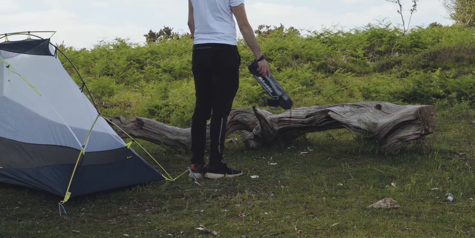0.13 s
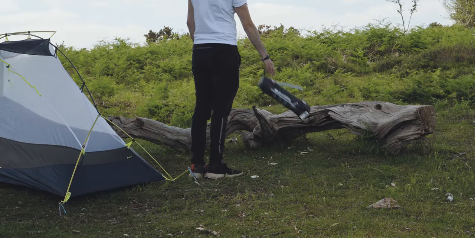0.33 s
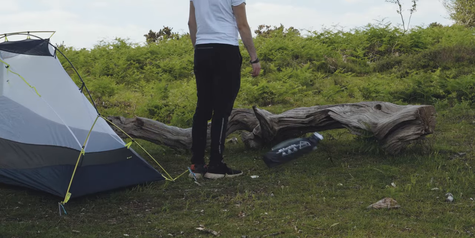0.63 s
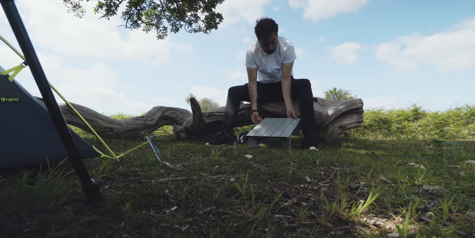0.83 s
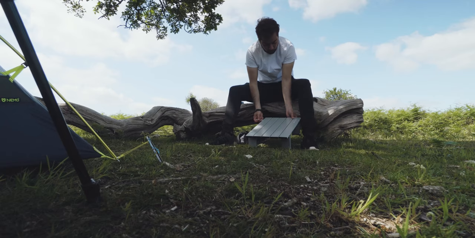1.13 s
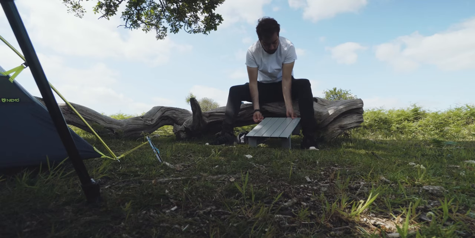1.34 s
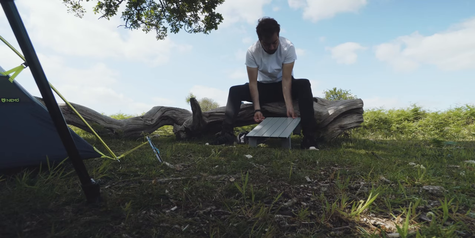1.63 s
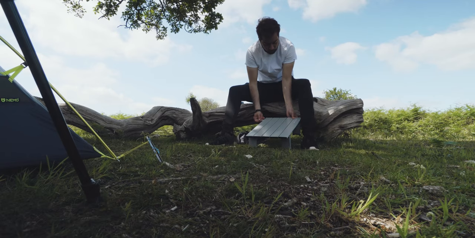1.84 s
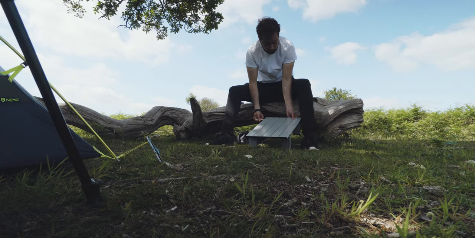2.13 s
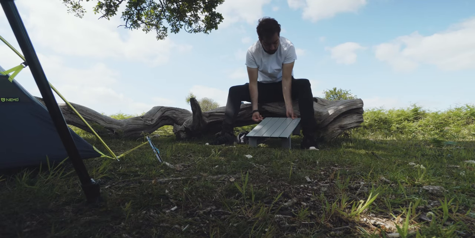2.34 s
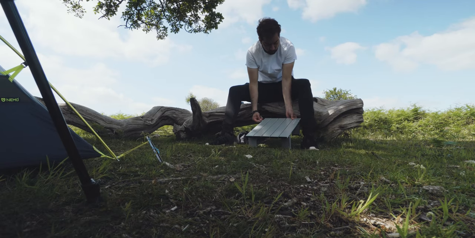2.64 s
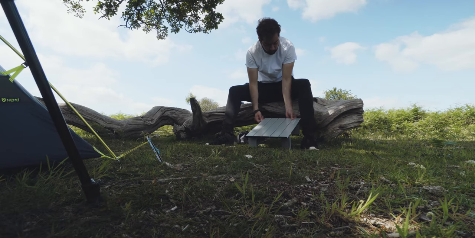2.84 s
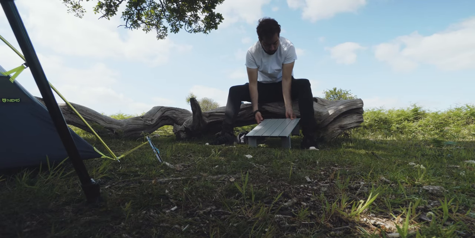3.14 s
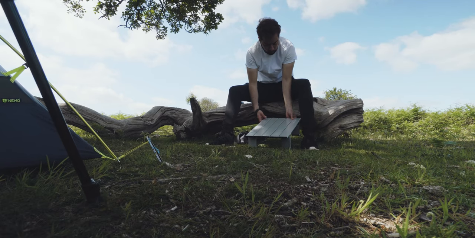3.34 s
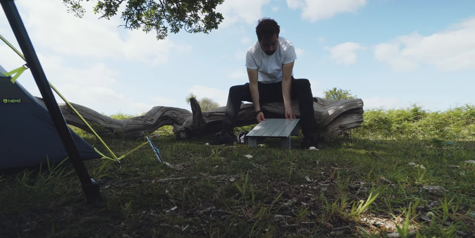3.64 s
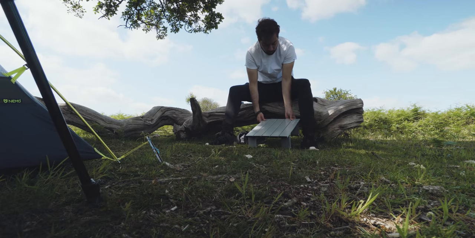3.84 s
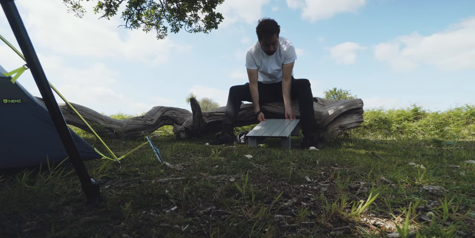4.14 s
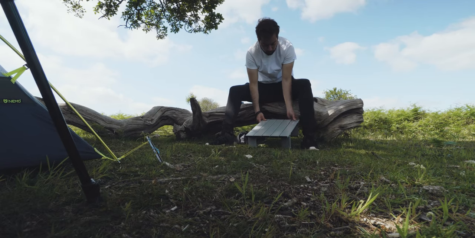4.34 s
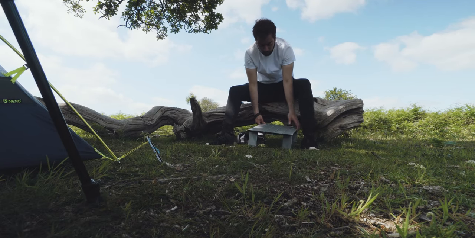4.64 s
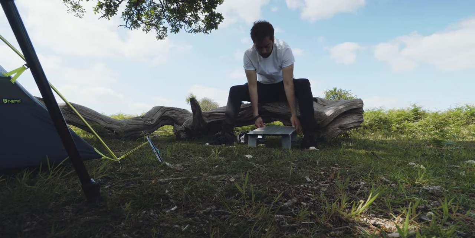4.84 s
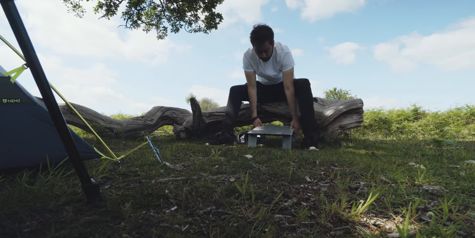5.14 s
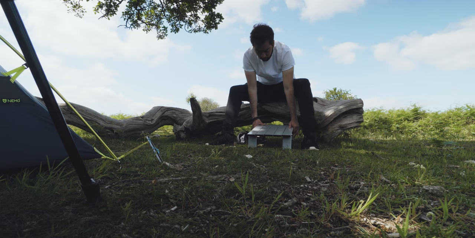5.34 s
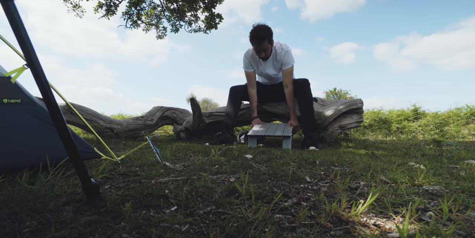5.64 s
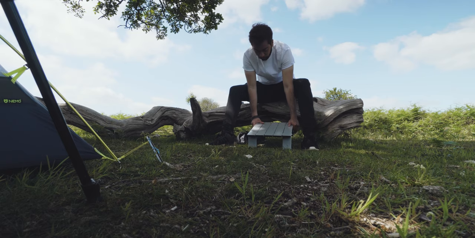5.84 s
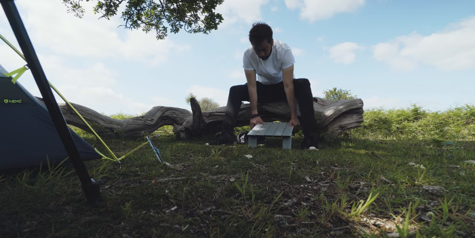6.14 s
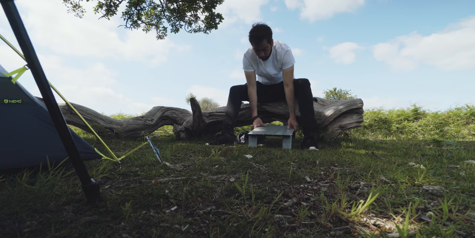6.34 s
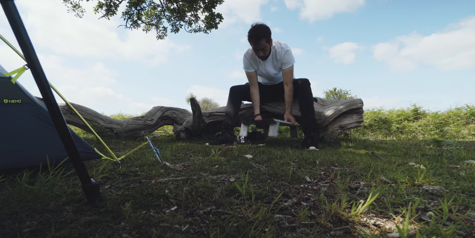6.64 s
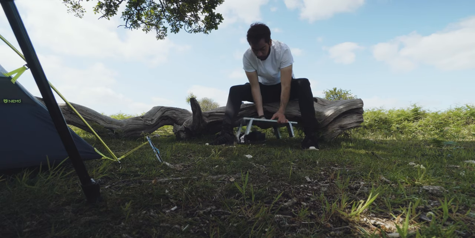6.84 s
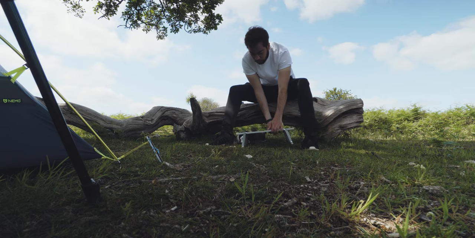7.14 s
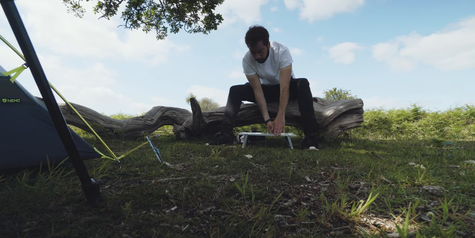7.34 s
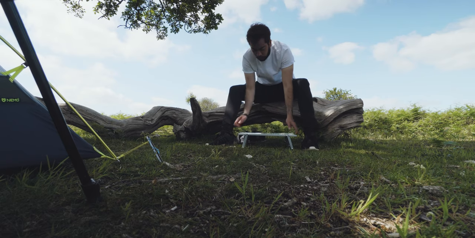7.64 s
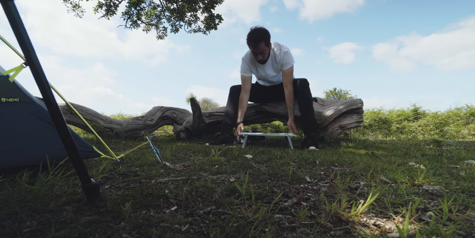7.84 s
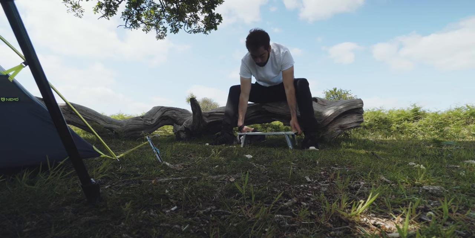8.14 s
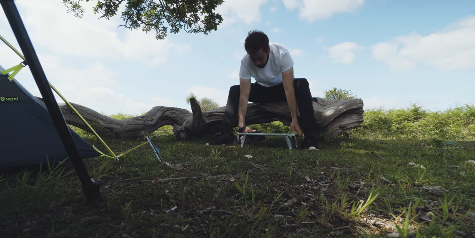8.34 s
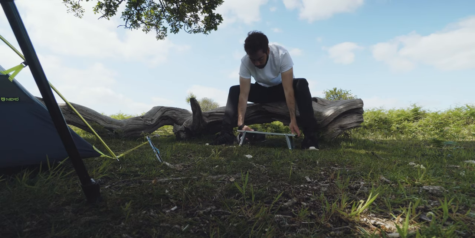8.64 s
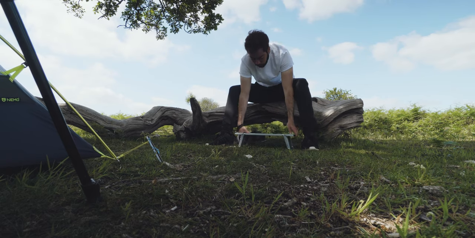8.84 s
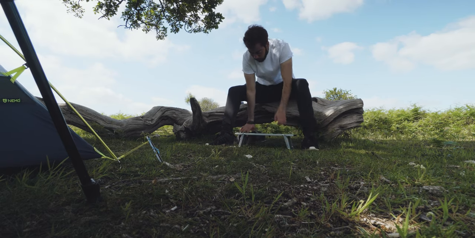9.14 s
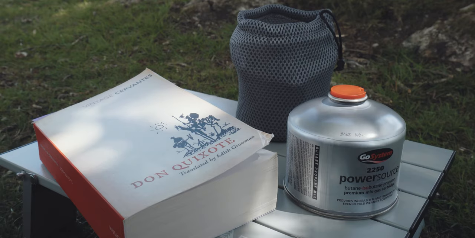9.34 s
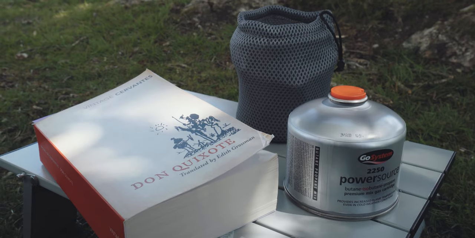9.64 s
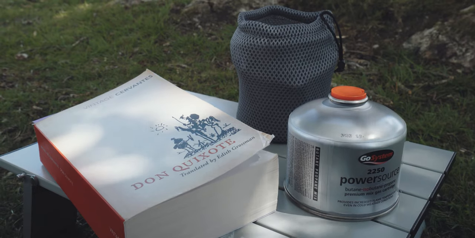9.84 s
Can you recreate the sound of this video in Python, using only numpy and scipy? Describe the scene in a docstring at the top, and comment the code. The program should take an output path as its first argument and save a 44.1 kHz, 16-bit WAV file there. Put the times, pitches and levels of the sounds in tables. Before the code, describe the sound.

A lightweight metal camp table is assembled on grass. A tight burst of dry clacks comes early, more snaps follow after pauses, the sharpest near four seconds. Then come quiet knocks, jiggling slats, thin scraping legs and small latch clicks, ending in brushing cloth and stirred leaves. The microphone stands a few metres off in nearly echo-free open air, with rumbling wind, distant roar and a weak engine drone.

```python
"""Slats of a light aluminium camp table clack, slide and snap together outdoors, a few metres away.
Its legs scrape and latch, small knocks set it down, and cloth and grass rustle over wind, roar and engine drone.
Noise bursts, random contacts and dying sines make the metal; filtered contacts make slides, scrapes and cloth.
The air is drifting shaped noise with crackling leaves, and the engine is a wavering tone with its octave."""
import sys
import numpy as np
from scipy import signal
from scipy.io import wavfile
from scipy.ndimage import uniform_filter1d

SR = 44100
rng = np.random.default_rng(int(sys.argv[2]) if len(sys.argv) > 2 else 0)


def to_wav(s):
    """Save 16-bit WAV."""
    ch = np.atleast_2d(s).T  # columns
    pcm = np.round(np.clip(ch, -1, 1) * 32767)  # PCM
    wavfile.write(sys.argv[1], SR, pcm.astype(np.int16))


N = 440559
TIME = np.arange(N) / SR

# Modes of the table top: [f/Hz, relative level/dB, t60/s when ringing freely]
TOP_MODES = [(454.3, 2.5, 0.11), (626, -34, 0.054), (978, 3, 0.11), (1002, -5.5, 0.23), (1192, -9, .5),
             (1280, 0, .12), (1357, -13, .5), (1422, -3, .11), (1700, -13, 0.13), (1838, -0.5, 0.17),
             (1930, -5.5, 0.12), (1990, 5, 0.09), (2148, -23, 0.2), (2240, -13, 0.083), (2540, -19, 0.37),
             (2730, -15, 0.29), (2774, -23, 0.12), (3380, -10.5, 0.12), (3576, -22, 0.12),
             (4050, -10, 0.12), (4386, -7.5, 0.15), (6100, -11, 0.11)]
# Crowd of short-lived slat resonances, as a spectrum: [f/Hz, relative level/dB]
SLAT_SPECTRUM = [(60, -18.5), (170, -9.5), (270, -14.5), (360, -4.5), (600, -6), (800, -4.5), (1400, 0.5),
                 (1900, -8), (2500, -12.5), (3300, -8), (4500, -13), (6000, -15), (10000, -21.5),
                 (16000, -30)]
# Modes of a leg: [f/Hz, relative level/dB, t60/s]
LEG_MODES = [(1850, 6, 0.055), (2010, 10, 0.056), (2945, -1.5, .05), (3530, -11, 0.043), (3990, 2, 0.03),
             (4500, -10, .04), (5030, 1.5, 0.059), (6100, -4, 0.045), (6570, 0, 0.026), (6740, -6, .03),
             (7300, -9, .03), (8500, -1, .03), (9100, -7, .02), (10000, -2, 0.025), (12300, -12, 0.0098)]
# Spectrum of rustling leaves, grass and cloth: [f/Hz, relative level/dB]
RUSTLE_SPECTRUM = [(500, -37), (2000, 0), (3800, 1), (5500, -4), (8000, -4.5), (12000, -8.5), (15500, -9)]


def table():
    """Blows shake the table top and its slats; slides rub the slats along the frame."""
    # slats snapping together: [t/s, level/dB, thud/dB, brightness/dB, hard edge/dB, rattle time/s,
    # ring against clack/dB, struck part's resonance f/Hz, its height/dB]
    clacks = [ (.635, -22.5, 4, 5.5, -1.5, .006, -28, 1710, 7.5),
              (.645, -21.5, 0.5, -3.5, -8, .014, -26, 1460, -6),
              (.661, -24.5, 3.5, 0.5, -11, 0.021, -24, 1410, -1.5),
              (.856, -31.5, -3.5, -3, -9.5, 0.014, -8, 1040, 4.5),
              (1.067, -40, 3.5, -2, -5, 0.022, -25, 870, 5.5),
              (2.468, -33, 1, 0.5, -6, 0.026, -18, 1400, -2),
              (2.479, -24.5, -3.5, 7.5, 6, 0.0086, -12, 3080, 6.5),
              (2.495, -21.5, -9, -4.5, -24, 0.013, -9, 950, 5.5),
              (3.388, -29, 2, 6.5, -12, 0.019, -8, 1440, 2),
              (3.812, -31, 0, -26, 0, 0.0016, -10.5, 1290, 19),
              (3.974, -36, 2, -0.5, -8, .03, -20, 1400, 1),
              (3.9842, -17, -3, -3, -1.5, 0.00056, -6.5, 1316, 11.5),
              (3.9916, -29.5, 1, 1, -13, .001, -14, 1310, 13),
              (4.6774, -28, 12, 0.5, 14, 0.0016, -3, 950, 8),
              (4.686, -29, 3.5, -14.5, -8, 0.025, -3, 965, 5)]
    # frame knocking as it is turned and set down: [t/s, level/dB, brightness/dB, rattle time/s,
    # struck part's resonance f/Hz, its height/dB]
    knocks = [(.904, -47.5, 8.5, 0.018, 1300, 10), (.971, -52.5, -4, .009, 1400, 5),
              (1.007, -48.5, -16, .004, 1160, 19), (1.696, -45.5, 1.5, 0.0036, 1210, 9),
              (2.534, -37.5, -8, 0.0056, 1400, 10), (4.855, -46, -5, 0.0027, 2010, 10),
              (4.8841, -43, 11, 0.005, 460, 7), (5.4788, -47.5, -8, .001, 950, 15),
              (5.5134, -49.5, 5, .001, 1070, 18), (5.6145, -44.5, 8.5, .001, 1110, 19),
              (5.702, -50.5, -9, 0.00065, 1010, 11), (5.806, -54.5, -15, 0.00087, 1040, 1),
              (6.0871, -36.5, -8, 0.0024, 1230, 2), (6.329, -46, 6, 0.0071, 515, 3.5),
              (6.432, -45.5, 2, .002, 537, 9), (6.537, -43, -3.5, 0.0097, 500, 14),
              (7.029, -50, -5, 0.013, 1100, 11), (7.134, -47.5, 18, 0.022, 474, 13),
              (7.148, -44, 4, .023, 1870, 0), (7.375, -45.5, 4.5, 0.054, 452, 1),
              (7.407, -43.5, 3, 0.011, 467, 4), (8.025, -46.5, 3, 0.013, 900, 8),
              (8.061, -50, 1, .006, 1150, 4)]
    # low booms of the table near its lowest resonance, from soft bumps or sliding slats: [t/s, level/dB]
    booms = [(2.02, -55.5), (2.201, -56.5), (3.425, -46), (3.815, -48), (4.243, -54), (4.824, -50),
             (5.262, -51.5), (5.418, -53), (5.648, -56), (6.105, -47), (6.217, -50.5), (6.612, -63)]
    # small sharp ticks: [t/s, level/dB, sharpness/dB]
    ticks = [(.362, -47.5, -1), (.701, -47, 1), (2.343, -51.5, -7), (2.383, -53.5, -2), (3.468, -50, -3),
             (3.612, -57, 1), (4.907, -43, 5.5), (8.346, -56, 2), (8.796, -49.5, 0), (9.265, -51, 10.5),
             (9.498, -53.5, 4), (9.716, -50.5, 1)]
    # slats sliding along the frame: [start t/s, strongest t/s, end t/s,
    # level before the duration scaling/dB, brightness/dB]
    slides = [(2.714, 2.771, 2.852, -60.5, 0), (2.872, 2.931, 2.98, -66, -1), (3.32, 3.4, 3.43, -60.5, 1.5),
              (3.775, 3.815, 3.84, -63.5, -4), (7.11, 7.14, 7.17, -66, 10)]
    out = np.zeros(N)
    for s, *row in clacks:
        add(out, s, blow(*row))
    for s, db, bright_db, rattle_s, hz, height_db in knocks:
        add(out, s, blow(db, thud_db=9, bright_db=bright_db, edge_db=-8, rattle_s=rattle_s,
                         ring_db=-5, zone_hz=hz, zone_db=height_db))
    for s, db in booms:
        add(out, s, blow(db, thud_db=2, bright_db=-6, edge_db=-6, rattle_s=.007,
                         ring_db=11.5, zone_hz=482, zone_db=17.5))
    for s, db, sharp_db in ticks:
        add(out, s, blow(db, thud_db=4.5, bright_db=sharp_db, edge_db=sharp_db, rattle_s=0.0018,
                         ring_db=-2, zone_hz=4140, zone_db=2.5))
    for row in slides:
        add(out, row[0], slide(*row))
    return out


def blow(db, thud_db, bright_db, edge_db, rattle_s, ring_db, zone_hz, zone_db,
         zone_octaves=0.19, low_t60=0.062, high_t60=0.068, crack_s=0.002, crack=0.44,
         rebound=0.94, grip_per_s=1.8):
    """One contact and its quick rebounds shake the slats, and the table top rings on."""
    t = np.arange(SR // 2) / SR

    def contact(hz):
        """Tone in dB of the contact, with a hump where the struck part resonates."""
        octaves_off = np.log2((hz + 1) / zone_hz)
        zone = zone_db * np.exp(-.5 * (octaves_off / zone_octaves) ** 2)
        thud = thud_db * (1 - treble(hz, corner_hz=715))
        return zone + thud + bright_db * treble(hz) + edge_db * treble(hz, corner_hz=8000)

    snap, shiver = rng.standard_normal((2, len(t)))
    crack_burst = evened(snap * np.sqrt(t) * np.exp(-t / crack_s))
    # the shiver's lows and highs, split at 2500 Hz, each have their own decay
    low = signal.lfilter(*signal.butter(2, 2500, fs=SR), shiver)
    high = shiver - low
    shiver = low * gain_of(-60 * t / low_t60) + high * gain_of(-60 * t / high_t60)
    rebounds = grains(len(t), per_s=3000, spread_db=0.5) * np.exp(-t / rattle_s)
    # a looser contact, with a longer rattle, puts more of its energy into the rebounds
    rebound_gain = rebound * np.sqrt(rattle_s / 0.0066)
    force = crack * crack_burst + evened(shiver) + rebound_gain * evened(rebounds)
    clack = colour(force, lambda hz: read(SLAT_SPECTRUM, hz) + top_colour(hz) + contact(hz))
    # a part held in the hand rings both weaker and shorter
    grip = np.exp(-t * grip_per_s * max(-ring_db - 6, 0))
    ring = colour(ringing(TOP_MODES, t, uneven_db=0.5) * grip, contact)
    sound = evened(clack) + gain_of(ring_db) * evened(ring)
    return gain_of(db) * energy_evened(sound)


def top_colour(hz, height_db=5, width_hz=28):
    """Even a short clack is stronger where the table top resonates."""
    centres = np.transpose(TOP_MODES)[0][:, None]
    humps = 1 / (1 + ((hz - centres) / width_hz) ** 2)
    return height_db * humps.max(0)


def slide(start, peak, end, db, bright_db, ring_db=-6):
    """Uneven slips of metal on metal swell and fade, exciting slats, table top and rail."""
    t = np.arange(SR // 2) / SR
    effort = np.interp(start + t, [start, peak, end], [0, 1, 0]) ** 1.47
    slips = grains(len(t), per_s=3500, spread_db=1.0) * effort
    rub = evened(colour(slips, lambda hz: read(SLAT_SPECTRUM, hz)))
    ring = evened(signal.fftconvolve(slips, ringing(TOP_MODES, t, uneven_db=2))[:len(t)])
    # the rail that the slats run in
    rail = evened(resonate(slips, 1320, 100) + 0.46 * resonate(slips, 3100, 150))
    sound = rub + gain_of(ring_db) * ring + 0.69 * rail
    tone = lambda hz: bright_db * treble(hz) - 7 * treble(hz, corner_hz=5800)
    sound = evened(colour(sound, tone))
    return gain_of(db) * sound * np.sqrt(1 / max(end - start, .01))  # shorter slides are stronger


def jiggle(ring_db=-6, contact_s=0.0044, count=8):
    """Loose slats touch at random; each slat has its own tiny clack and ring."""
    # slats jiggling while the table is turned: [start t/s, strongest t/s, end t/s, level/dB]
    jiggles = [(4.8, 4.9, 5.54, -60.5), (5.2, 5.5, 7, -64), (6.1, 6.35, 6.59, -60.5)]
    t, out = TIME[:SR // 4], np.zeros(N)
    for _ in range(count):
        burst = rng.standard_normal(len(t)) * np.exp(-t / contact_s)
        clack = colour(burst, lambda hz: read(SLAT_SPECTRUM, hz))
        ring = ringing(TOP_MODES, t, uneven_db=5)
        touches = grains(N, per_s=9, spread_db=5.0)
        touch = evened(clack) + gain_of(ring_db) * evened(ring)
        out += signal.oaconvolve(touches, touch)[:N]
    return strokes(jiggles) * evened(out)


def legs(shift_db=3.5, bend=0.017, scratch=0.65, catch_db=2.8):
    """Friction sounds the thin legs; as the contact moves, each mode comes and goes."""
    # legs dragging in their hinges: [start t/s, strongest t/s, end t/s, level/dB]
    scrapes = [(6.65, 6.85, 7.1, -71), (7.05, 7.18, 7.52, -61.5), (7.92, 7.99, 8.12, -58),
               (8.05, 8.16, 8.24, -54), (8.3, 8.62, 8.75, -66), (8.65, 8.8, 9.0, -60.5)]
    slips = grains(N, per_s=3500, spread_db=1.5) * gain_of(catch_db * wander(per_s=60))
    tube = np.zeros(N)
    for hz, db, t60 in LEG_MODES:
        level = gain_of(db + shift_db * wander(per_s=31))
        moving_hz = hz * (1 + bend * wander(per_s=20))
        tube += level * resonate(slips, moving_hz, 1.9 / t60)
    grit_spectrum = [(1000, -18), (3500, 6.5), (6500, 4), (10000, -3), (15000, 1)]  # (Hz, dB)
    grit = colour(slips, lambda hz: read(grit_spectrum, hz))
    return evened(evened(tube) + scratch * evened(grit)) * strokes(scrapes)


def latches(uneven_db=2, click_db=-7, click_s=.003):
    """A leg snaps into its lock: a short noise click and the leg's ringing modes."""
    # legs locking: [t/s, level/dB, brightness/dB]
    locks = [(8.131, -44.5, -12), (8.176, -49, 33)]
    out, t = np.zeros(N), TIME[:SR // 4]
    for s, db, bright_db in locks:
        click = rng.standard_normal(len(t)) * np.exp(-t / click_s)
        snap = evened(ringing(LEG_MODES, t, uneven_db)) + gain_of(click_db) * evened(click)
        sound = colour(snap, lambda hz: bright_db * treble(hz))
        add(out, s, gain_of(db) * energy_evened(sound))
    return out


def cloth(band_hz=600, fizz=0.66, flutter_db=3.5, unsteady=0.044):
    """Tiny thread contacts of ribbed cloth hiss in a band that glides and wavers with the stroke."""
    # cloth brushing on cloth: [start t/s, end t/s, level before taper and flutter/dB,
    # band at the start f/Hz, band at the end f/Hz], band before its waver
    swishes = [(1.66, 1.9, -80, 6700, 6400), (4.327, 4.66, -75.5, 3500, 8050),
               (5.623, 5.92, -69.5, 4000, 4400), (5.918, 6.05, -73, 3700, 4200),
               (9.267, 9.606, -64, 3760, 3600), (9.61, 9.85, -60.5, 3000, 3800),
               (9.802, 10.097, -58, 2930, 3740)]
    out = np.zeros(N)
    for start, end, db, from_hz, to_hz in swishes:
        count = max(round((end - start) * SR), 256)
        threads = grains(SR, per_s=1600, spread_db=3.3)[:count]
        speed = 1 + unsteady * wander(per_s=21.8)[:count]
        centre_hz = np.geomspace(from_hz, to_hz, len(threads)) * speed
        band = resonate(threads, centre_hz, band_hz)
        hiss = colour(threads, lambda hz: read(RUSTLE_SPECTRUM, hz))
        swish = evened(evened(band) + fizz * evened(hiss))
        add(out, start, gain_of(db) * swish * signal.windows.tukey(len(threads), .7))
    return out * gain_of(flutter_db * wander(per_s=51))  # folds catch and let go


def outdoors(drift_db=1.07, crackle=0.11):
    """Shaped noise makes wind rumble, distant roar and rustle; tiny contacts crackle in the leaves."""
    # spectrum of the wind rumble: [f/Hz, relative level/dB]
    wind_spectrum = [(10, -1), (25, 2.5), (40, -2.5), (60, 4), (80, -0.5), (110, -10.5), (160, -24),
                     (300, -30), (700, -73)]
    # spectrum of the distant roar: [f/Hz, relative level/dB]
    roar_spectrum = [(100, 9.5), (200, 0), (330, -3.5), (520, -5), (720, 1.5), (1000, 0), (1400, -4.5),
                     (1900, -11), (2600, -22.5), (4000, -33.5), (9000, -58)]
    # wind swelling at the microphone: [start t/s, strongest t/s, end t/s, level/dB]
    puffs = [(-.2, 0, .2, -35.5), (.15, .45, 0.81, -36.5), (6.2, 7.1, 7.67, -40.5), (8.5, 9.5, 16, -40)]
    # grass and leaves stirred by movement: [start t/s, strongest t/s, end t/s, level/dB]
    stirs = [(4.25, 4.7, 5.4, -64.5), (6.1, 6.38, 6.9, -67.5), (9.25, 9.4, 9.78, -56.5),
             (9.7, 9.95, 11, -60)]
    wind_db, roar_db, rustle_db = -45, -51.5, -69.5  # base levels
    # roar and rustle are louder at first
    opening_s, opening_fade_s, opening_roar_db, opening_rustle_db = .54, 0.11, 5, 6.5
    opening = np.interp(TIME, [opening_s, opening_s + opening_fade_s], [1, 0])
    roar = gain_of(roar_db + opening_roar_db * opening + drift_db * wander(per_s=4))
    rustle = np.hypot(gain_of(rustle_db + opening_rustle_db * opening), strokes(stirs))
    wind = np.hypot(gain_of(wind_db), strokes(puffs))
    contacts = grains(N, per_s=700, spread_db=5)
    blades = evened(colour(contacts, lambda hz: read(RUSTLE_SPECTRUM, hz)))
    leaves = noise(RUSTLE_SPECTRUM, patchy_db=-1.3) + crackle * blades
    return (wind * noise(wind_spectrum, patchy_db=0.0, size=4096)
            + roar * noise(roar_spectrum, patchy_db=0.66)
            + rustle * leaves)


def engine(drone_db=-66, waver=0.00387, flutter_db=1, octave_db=-14, approach_s=3.9):
    """A far engine hums a tone and its octave, fading in and wavering in the moving air."""
    # pitch path of the far engine: [t/s, f/Hz before the waver]
    pitch_path = [(0, 218), (2.8, 220.5), (5.5, 213.4), (6.3, 219.5), (7.4, 221), (9.2, 227)]
    # swell of the drone: [start t/s, strongest t/s, end t/s, level before flutter/dB]
    swell = [(6.25, 7.0, 7.7, -54)]
    s, hz = np.transpose(pitch_path)
    pitch = np.interp(TIME, s, hz) * (1 + waver * wander(per_s=9.7))
    angle = 2 * np.pi * np.cumsum(pitch) / SR
    approach = np.minimum(TIME / approach_s, 1)
    level = np.hypot(gain_of(drone_db) * approach, strokes(swell))
    level = level * gain_of(flutter_db * wander(per_s=7.2))
    return level * evened(np.sin(angle) + gain_of(octave_db) * np.sin(2 * angle))


def surroundings(x, wet_db=-20, t60=0.19, dull_db=-6):
    """Faint scatter from the ground, the log and the tree: random echoes that die away, dulled."""
    t = TIME[:SR // 2]
    taps = grains(len(t), per_s=2000, spread_db=1) * gain_of(-60 * t / t60) * (t > .004)
    echo = signal.oaconvolve(x, taps / np.linalg.norm(taps))[:N]
    return gain_of(wet_db) * colour(echo, lambda hz: dull_db * treble(hz))


def grains(count, per_s, spread_db):
    """Random tiny contacts of uneven size and either sign, about per_s a second over count samples."""
    uneven = gain_of(spread_db * np.minimum(rng.exponential(1, count), 4))
    size = uneven * rng.choice([-1, 1], count)
    return size * (rng.random(count) < per_s / SR)


def ringing(modes, t, uneven_db):
    """Dying sines; each call weights them a little differently."""
    hz, db, t60 = np.transpose(modes)[:, :, None]
    db = db + uneven_db * rng.standard_normal(hz.shape)
    sign = rng.choice([-1, 1], hz.shape)
    sines = sign * gain_of(db - 60 * t / t60) * np.sin(2 * np.pi * hz * t)
    return sines.sum(0)


def resonate(x, hz, width_hz):
    """A resonance of gain 1 that follows the curve hz: shift it to 0 Hz, smooth, shift back."""
    turn = np.exp(2j * np.pi * np.cumsum(hz * np.ones(len(x))) / SR)
    r = np.exp(-np.pi * width_hz / SR)
    smooth = signal.lfilter([1 - r], [1, -r], x / turn + 1e-18)
    return 2 * (turn * smooth).real


def noise(spectrum, patchy_db, size=1024):
    """Noise of a given spectrum whose level drifts in patches of time and frequency."""
    hz = np.fft.rfftfreq(size, 1 / SR)
    a, b, patches = rng.standard_normal((3, N // (size // 4) + 5, len(hz)))
    patches = uniform_filter1d(patches, size=12, axis=0)  # along time
    patches = evened(uniform_filter1d(patches, size=14, axis=1))  # along frequency
    z = (a + 1j * b) * gain_of(read(spectrum, hz) + patchy_db * patches)
    sound = signal.istft(z.T, nperseg=size, noverlap=size - size // 4)[1][:N]
    return evened(sound)


def colour(x, db_at, size=4096):
    """Causal minimum-phase filter whose gain in dB is the function db_at(Hz), floored at -100 dB."""
    hz = abs(np.fft.fftfreq(size, 1 / SR))
    log_gain = np.log(gain_of(np.maximum(db_at(hz), -100)))
    taps = np.fft.ifft(np.exp(np.conj(signal.hilbert(log_gain)))).real
    return signal.oaconvolve(x, taps[:size // 2])[:len(x)]


def treble(hz, corner_hz=2400):
    """Share 0-1 that a frequency has in the bright part of a sound."""
    return hz ** 4 / (hz ** 4 + corner_hz ** 4)


def read(points, hz):
    """Reads a spectrum on a log-frequency axis."""
    f, value = np.transpose(points)
    return np.interp(np.log(hz + 1), np.log(f), value)


def strokes(rows, curve=0.72):
    """Level over time of strokes that each swell to a peak and fade; curve sets how sharply."""
    level = np.zeros(N)
    for start, peak, end, db in rows:
        level += gain_of(db) * np.interp(TIME, [start, peak, end], [0, 1, 0]) ** curve
    return level


def wander(per_s):
    """A random curve of rms 1: straight lines between per_s random points a second."""
    knots = rng.standard_normal(4000)
    return evened(np.interp(TIME * per_s, np.arange(len(knots)), knots))


def gain_of(db):
    """Decibels to amplitude."""
    return 10 ** (np.asarray(db) / 20)


def evened(x):
    """Scales to rms 1."""
    return x / np.sqrt(np.mean(x ** 2) + 1e-20)


def energy_evened(x):
    """Scales to the energy of rms 1 over 20 ms, however long the sound."""
    return x / np.linalg.norm(x) * np.sqrt(SR / 50)


def add(mix, s, sound):
    """Mixes a sound in at time s."""
    part = mix[round(s * SR):][:len(sound)]
    part += sound[:len(part)]


def scene():
    """The table in the open air."""
    metal = table() + jiggle() + legs() + latches()
    return (metal + surroundings(metal) + cloth() + outdoors() + engine())[None]


def record(dry):
    """A linear-phase low-pass at 16 kHz limits the band."""
    taps = signal.firwin(255, 16000, window=("kaiser", 9), fs=SR)
    return signal.oaconvolve(dry, taps[None], "same")


dry = scene()
out = record(dry)
to_wav(out)
```